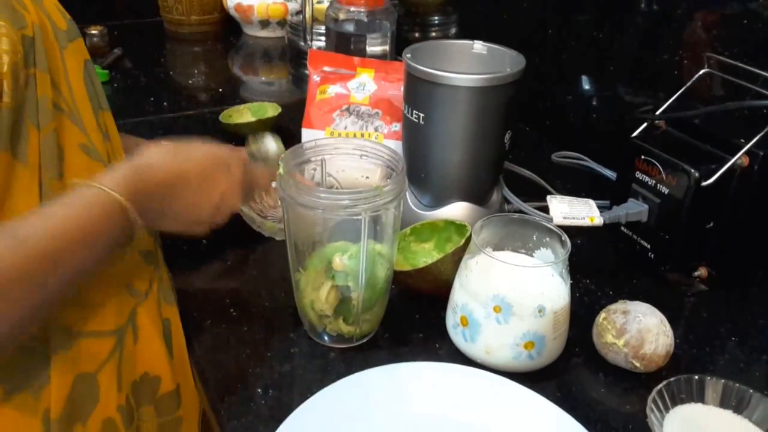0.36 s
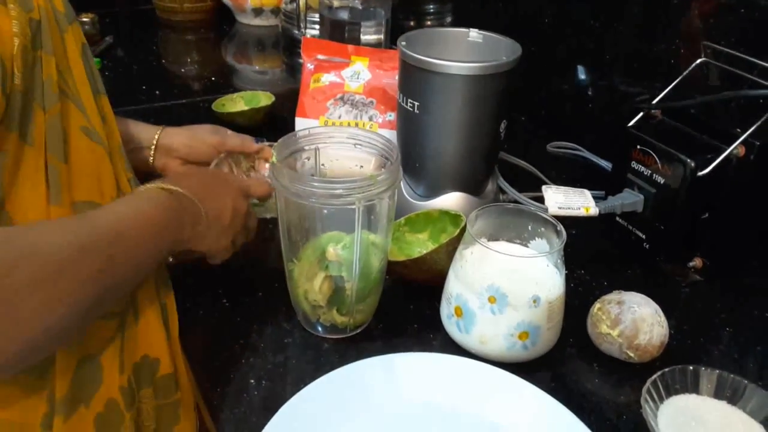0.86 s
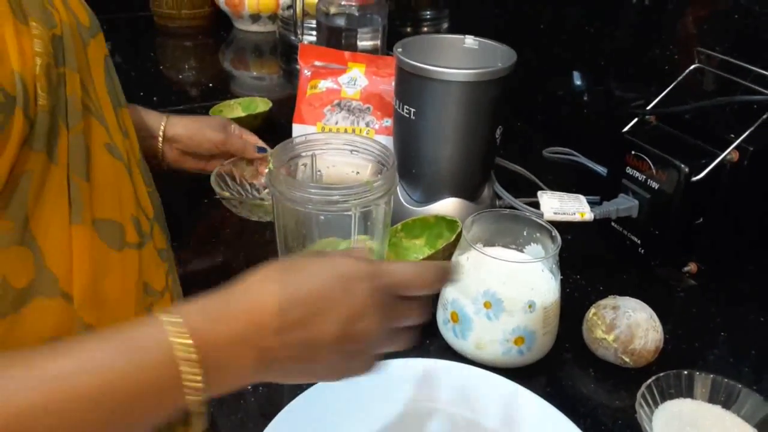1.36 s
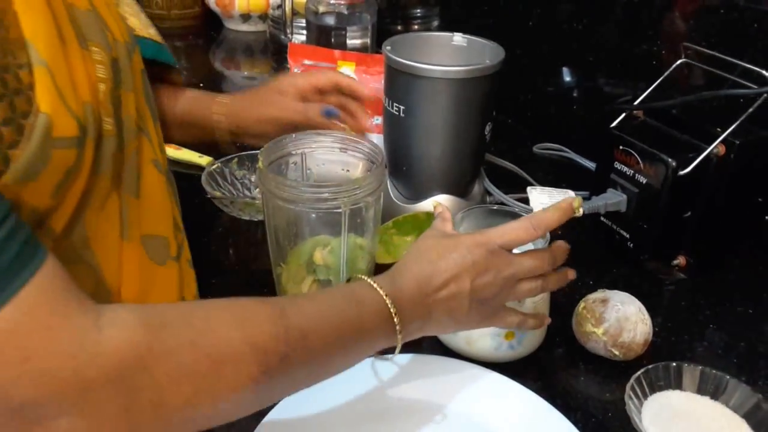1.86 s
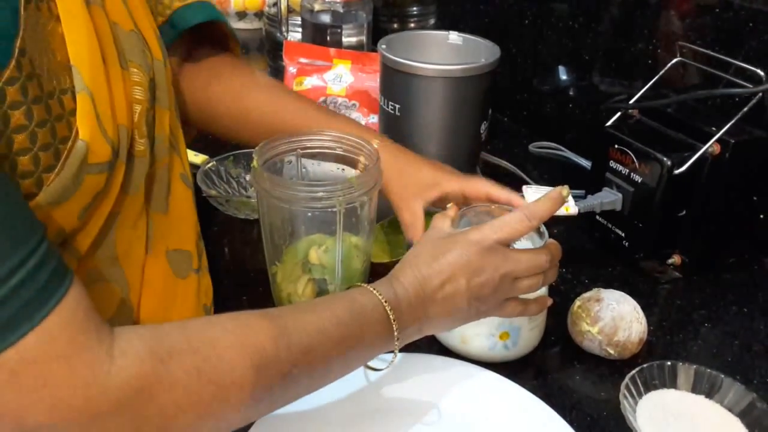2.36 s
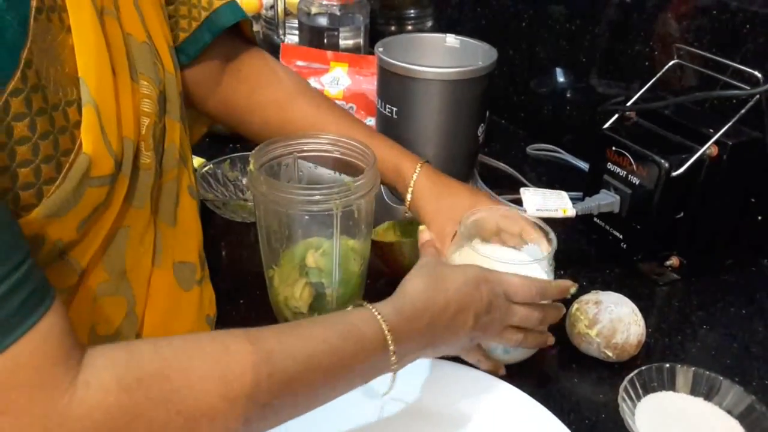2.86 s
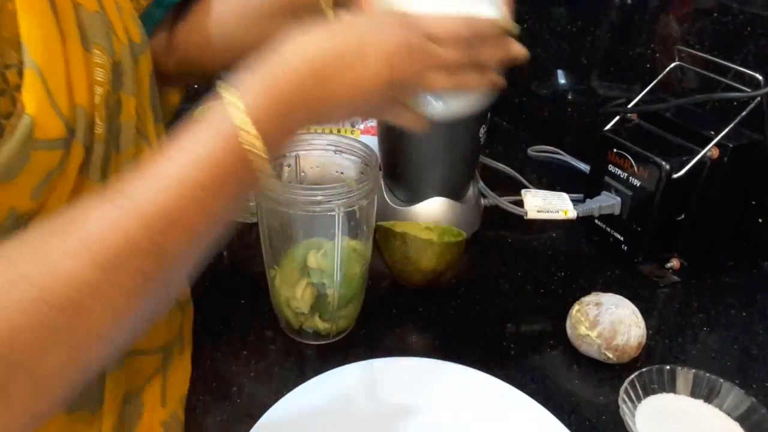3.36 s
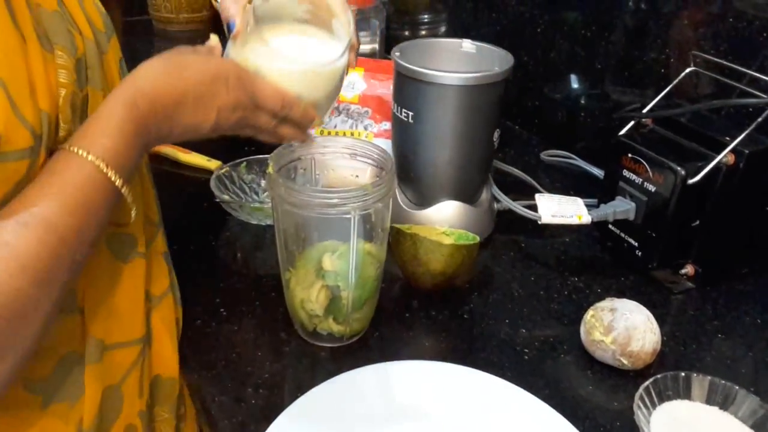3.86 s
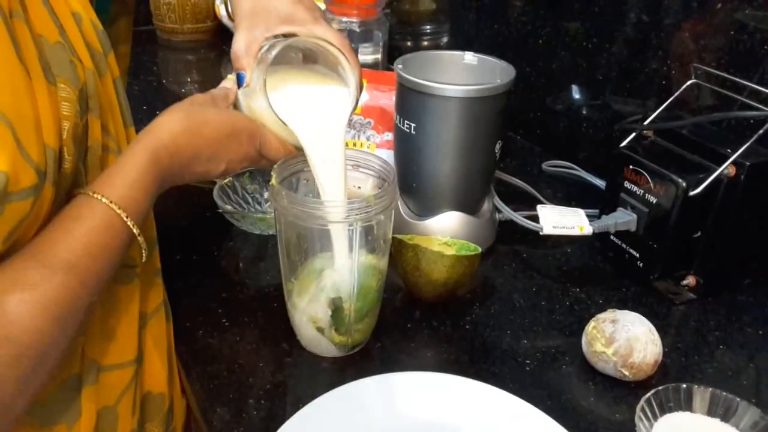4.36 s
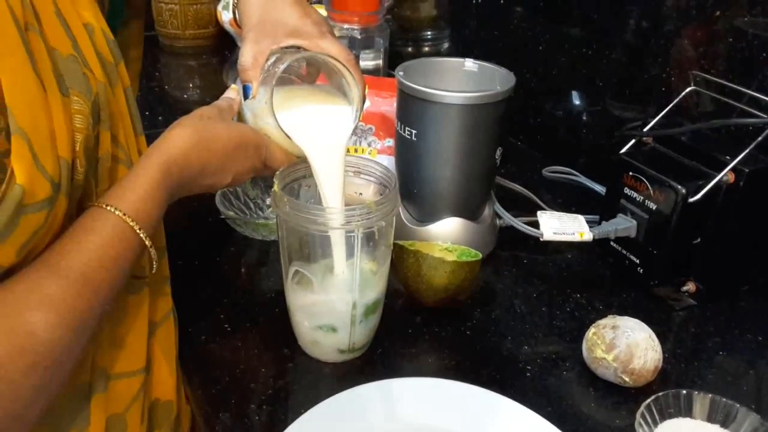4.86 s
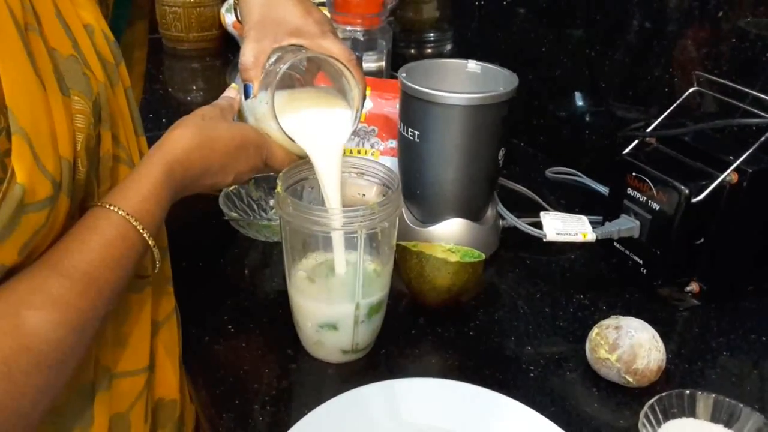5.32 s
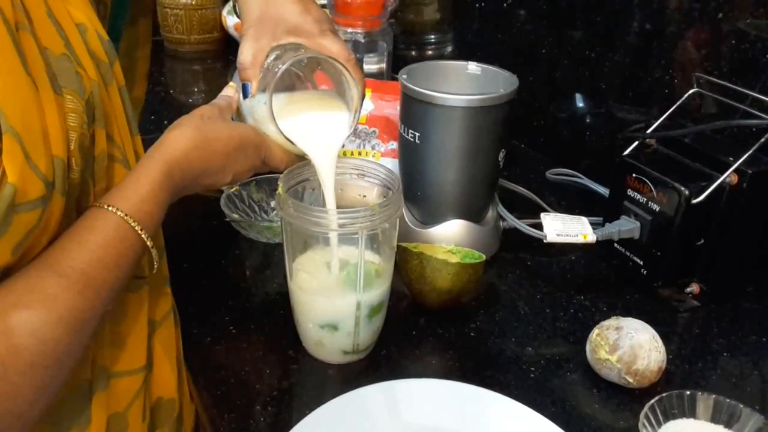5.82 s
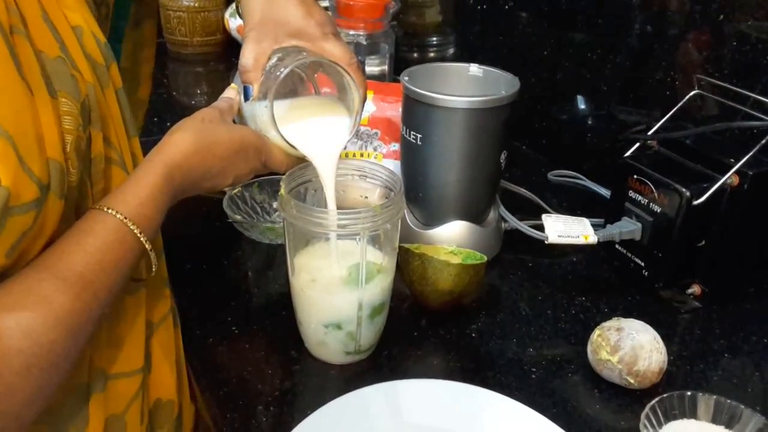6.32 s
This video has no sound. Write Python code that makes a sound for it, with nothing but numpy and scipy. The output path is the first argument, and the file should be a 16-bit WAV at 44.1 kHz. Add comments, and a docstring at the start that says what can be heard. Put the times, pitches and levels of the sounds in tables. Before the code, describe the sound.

In a humming kitchen, steel taps glass and knocks on stone, a soft pause of rustling, then milk splashes and gurgles into a plastic cup.

```python
"""A refrigerator motor hums, an electronic device whines faintly, room and microphone hiss; sleeves rustle.
A steel spoon grazes a plastic cup and clinks on a small glass bowl, then the bowl is set on a stone counter:
beating modes, noise scrapes and noise knocks, in a hard-walled kitchen. A jar is lifted: soft noise puffs.
Milk dribbles, then pours into a tall plastic cup: bubbles, spray, and narrow noise on the air column's modes,
which climb as the cup fills and wander late in the pour."""
import sys
import numpy as np
from scipy import signal
from scipy.fft import rfft, irfft, next_fast_len
from scipy.io import wavfile
from scipy.ndimage import uniform_filter1d, map_coordinates

SR = 44100
rng = np.random.default_rng(int(sys.argv[2]) if len(sys.argv) > 2 else 0)


def wrap_up_sound(samples):
    """Save the sound to the file named by the first command line argument, as 16-bit audio."""
    columns = np.atleast_2d(samples).T
    # keep every value between -1 and 1, then stretch to whole-number steps
    tamed = np.clip(columns, -1, 1)
    steps = np.round(tamed * 32767).astype(np.int16)
    wavfile.write(sys.argv[1], SR, steps)


def voltage_ratio(decibels):
    """Convert decibels (scalar or array-like) to amplitude ratios, 20 dB per decade."""
    exponent = np.asarray(decibels, float) / 20
    return 10 ** exponent


N = 295689
T = np.arange(N) / SR


def unit(x):
    """Scales to unit rms."""
    return x / np.sqrt(np.mean(x ** 2) + 1e-20)


def along(points, hz):
    """Interpolates (f/Hz, value) points on a log axis."""
    f, v = np.transpose(points)
    return np.interp(np.log(hz + 1), np.log(f + 1), v)


def wobble(knots_per_s):
    """A smooth random curve."""
    knots = rng.standard_normal(int(N * knots_per_s / SR) + 4)
    return map_coordinates(knots, [T * knots_per_s])


def filtered(x, response):
    """x times a complex response of frequency."""
    m = next_fast_len(len(x) + SR // 2)
    return irfft(rfft(x, m) * response(np.fft.rfftfreq(m, 1 / SR)), m)[:len(x)]


def resonance(f, hz, width_hz):
    """Second-order band-pass, unity at its centre."""
    return 1j * f * width_hz / (hz * hz - f * f + 1j * f * width_hz)


def noise(response):
    """Unit-rms noise of a given spectrum."""
    return unit(filtered(rng.standard_normal(N), response))


def add(track, s, sound):
    """Mixes a short sound in at time s."""
    part = track[round(s * SR):][:len(sound)]
    part += sound[:len(part)]


def swell(start_s, top_s, end_s):
    """A soft rise and fall between three times."""
    return np.sin(np.pi / 2 * np.interp(T, [start_s, top_s, end_s], [0, 1, 0]))


def curves(tables, rest):
    """Columns of several (t/s, ..) tables, one value per sample, at rest between tables."""
    out = np.full((len(tables[0][0]) - 1, N), rest)
    for rows in tables:
        s, *cols = np.transpose(rows)
        on = (T >= s[0]) & (T <= s[-1])
        out[:, on] = [np.interp(T[on], s, c) for c in cols]
    return out


def breathy(hz, knots_per_s):
    """Narrow-band noise that follows a pitch curve; faster knots widen the band."""
    phase = 2 * np.pi * np.cumsum(hz) / SR
    return unit(wobble(knots_per_s) * np.cos(phase) + wobble(knots_per_s) * np.sin(phase))


# decay of the kitchen: [f/Hz, t60/s]
KITCHEN_T60 = [(100, 0.88), (400, 0.84), (1500, 0.85), (4000, 0.71), (10000, 0.4)]


def kitchen(x):
    """A diffuse tail, each frequency dying at its own speed."""
    hz, t, z = signal.stft(rng.standard_normal(SR), SR, nperseg=256)
    decay = voltage_ratio(-60 * t / along(KITCHEN_T60, hz)[:, None])
    tail = signal.istft(z * decay, SR, nperseg=256)[1]
    delayed = np.pad(x, (180, 0))  # samples
    return signal.fftconvolve(delayed, tail / np.linalg.norm(tail))


# motor orders: [multiple of rotation, mean level/dB]
MOTOR_ORDERS = [(1, -77.5), (2, -70.5), (3, -66.5), (4, -70.5), (5, -72.5), (6, -70), (7, -83.5), (8, -76),
                (10, -74.5)]


def motor_hum():
    """Harmonics of one unsteady rotation, each wavering in level."""
    phase = 2 * np.pi * np.cumsum(56.6 + .5 * wobble(3)) / SR  # Hz
    hum = np.zeros(N)
    for k, db in MOTOR_ORDERS:
        hum += voltage_ratio(db + 2.54 * wobble(9)) * np.sin(k * phase + rng.uniform(0, 2 * np.pi))
    return hum


# whine bands: [f/Hz, width/Hz of each of two passes, level/dB]
WHINE_BANDS = [(7800, 60, -83), (7870, 810, -80), (15400, 100, -82)]


def device_whine():
    """Noise in narrow bands, the top one nearly an octave up."""
    return sum(voltage_ratio(db) * noise(lambda f: resonance(f, hz, w) ** 2) for hz, w, db in WHINE_BANDS)


# room and microphone noise shape: [f/Hz, relative density/dB per Hz]
AIR_SPECTRUM = [(20, -30), (45, -16), (80, -12), (128, 3), (190, -12), (300, -7), (600, -14), (1000, -19.5),
                (2000, -26.5), (5000, -33), (7000, -37), (10000, -37), (11500, -30.5), (16000, -36.5)]


def air_hiss():
    """Broad shaped noise, drifting slowly in level."""
    drift_db = .6 * wobble(1.5)
    return voltage_ratio(-60 + drift_db) * noise(lambda f: voltage_ratio(along(AIR_SPECTRUM, f)))


# sleeves and hands move: [start t/s, loudest t/s, end t/s, level/dB before flutter]
# a swell stops at its end time; one ending before its start is silent
CLOTH_MOVES = [(.05, .3, 1.4, -70.5), (1.8, 2.1, 2.36, -74), (2.248, 2.49, 2.6, -70),
               (2.7, 2.77, 2.73, -71.5), (3.2, 3.555, 3.9, -71), (3.94, 3.99, 3.7, -73.5)]


def rustle():
    """Cloth friction: broad mid-band noise that flutters under slow swells."""
    moves = sum(voltage_ratio(db) * swell(*when) for *when, db in CLOTH_MOVES)
    return moves * voltage_ratio(0.92 * wobble(24.88)) * noise(lambda f: resonance(f, 1470, 2300))


def rings(modes, force_db, tilt_db_per_octave, split):
    """Each mode of an uneven object is a close cluster that beats."""
    t, out = T[:SR // 3], 0
    for hz, db, t60_s in modes:
        near_hz = hz * (1 + split * rng.standard_normal((3, 1)))
        cluster = np.sin(2 * np.pi * (near_hz * t + rng.random((3, 1))))
        cluster = voltage_ratio(rng.normal(0, 3.4, (3, 1))) * cluster
        level_db = force_db + db + rng.normal(0, 1.5) + tilt_db_per_octave * np.log2(hz / 4000)
        out = out + voltage_ratio(level_db - 60 * t / t60_s) * cluster.sum(0) / 2
    return out * (1 - np.exp(-t / 0.0011))


# plastic cup modes: [f/Hz, relative level/dB, t60/s]
CUP_MODES = [(1594, -1, 0.042), (1865, 1, 0.028), (2736, 2, 0.034), (9000, -22.5, 0.05),
             (11600, -20.5, .05)]


def cup_graze(room_db):
    """The spoon sets the cup's short modes ringing."""
    out = np.zeros(N)
    graze = rings(CUP_MODES, -28.5, 0, split=0.016)
    for sound in (graze, voltage_ratio(room_db) * kitchen(graze)):
        add(out, .664, sound)
    return out


# glass bowl and steel spoon modes: [f/Hz, relative level/dB, t60/s]
BOWL_MODES = [(1587, 3, .06), (1882, -6, 0.019), (2690, -4, 0.032), (3570, -13, 0.21), (5300, -12.5, 0.062),
              (6170, -5.5, 0.14), (6955, -15.5, 0.17), (9100, -14, 0.037), (9564, -2, 0.075),
              (11980, -8.5, 0.048), (13160, -19, 0.084), (15000, -21, .07)]
SPOON_MODES = [(3600, -6, 0.14), (4514, -15, 0.071), (6000, -27, 0.23), (7100, -13.5, 0.24),
               (9200, -6.5, 0.06), (10800, -3.5, 0.078), (11900, -9, 0.07), (13200, -9, 0.069),
               (13500, -14.5, .06), (15190, -12, 0.086)]


def bowl_and_spoon(bowl_db, spoon_db, tilt):
    """Both struck bodies ring together."""
    bowl = rings(BOWL_MODES, bowl_db, tilt, split=0.0077)
    return bowl + rings(SPOON_MODES, spoon_db, tilt, split=.008)


# bright scrape noise at each contact: [f/Hz, relative level/dB]
SCRAPE_SPECTRUM = [(500, -15), (1500, 3), (4000, -3), (7000, -3), (10000, -5.5), (13000, 0.5), (14200, -26),
                   (15200, -13), (16000, -6)]


def scrape(bowl_db, spoon_db):
    """Rough contact: a short burst of bright noise."""
    t = T[:SR // 3]
    grit = filtered(rng.standard_normal(len(t)), lambda f: voltage_ratio(along(SCRAPE_SPECTRUM, f)))
    envelope = voltage_ratio(-60 * t / 0.065) * (1 - np.exp(-t / 0.0013))
    return (voltage_ratio(bowl_db + 1.5) + voltage_ratio(spoon_db - 4)) * envelope * grit


# what a knock sounds through: [f/Hz, width/Hz, relative level/dB]
COUNTER_MODES = [(121, 110, -13), (212.4, 17.4, 1), (450, 496, -6.5), (800, 193, 1), (1360, 342, 1.5),
                 (1950, 770, -6), (2480, 240, -9), (3400, 1100, -25)]


def counter_knock(tilt):
    """A noise push through the counter's broad resonances; a harder contact tilts it brighter."""
    t = T[:SR // 3]

    def colour(f):
        stone = sum((-1) ** k * voltage_ratio(db) * resonance(f, hz, w)
                    for k, (hz, w, db) in enumerate(COUNTER_MODES))
        bass_cut = (1j * f / (110 + 1j * f)) ** 2
        return stone * bass_cut * voltage_ratio(tilt * np.log2((f + 100) / 1200))

    envelope = voltage_ratio(-60 * t / 0.059) * (1 - np.exp(-t / 0.0012))
    knock = filtered(envelope * rng.standard_normal(len(t)), colour)
    return knock * 12 / np.linalg.norm(knock)


def contact(out, s, knock_db, knock_tilt, bowl_db, spoon_db, ring_tilt, room_db):
    """One contact rings, scrapes and knocks, and the room answers; tilts in dB per octave."""
    hit = bowl_and_spoon(bowl_db, spoon_db, ring_tilt) + scrape(bowl_db, spoon_db)
    hit = hit + voltage_ratio(knock_db - 4) * counter_knock(knock_tilt)
    add(out, s, hit)
    add(out, s, voltage_ratio(room_db) * kitchen(hit))


# spoon strikes bowl: [t/s, relative bowl level/dB, relative spoon level/dB]
BOWL_CLINKS = [(.664, -35, -53.5), (.746, -20.5, -45.5), (.756, -28.5, -52.5), (.780, -25, -36.5)]


def clinks(room_db):
    """Steel on glass: strong ring over a weak, bright knock."""
    out = np.zeros(N)
    for s, bowl_db, spoon_db in BOWL_CLINKS:
        contact(out, s, bowl_db - 12, 9.8, bowl_db, spoon_db, 0.87, room_db)
    return out


# bowl and spoon meet counter: [t/s, relative knock level/dB, hardness/dB per octave, relative rattle level/dB]
COUNTER_KNOCKS = [(.795, -19, -1.5, -41), (.803, -29.5, -6.5, -42), (.937, -9, -1.5, -42),
                  (.941, -15.5, -2.5, -27), (.948, -26, 11.5, -38.5), (.956, -23, 6, -42),
                  (.970, -19, 1.5, -42), (.977, -23.5, -6, -33.5), (.987, -17.5, -2.5, -26),
                  (.996, -28, -7.5, -43), (1.007, -24.5, 3.5, -34), (1.020, -39.5, 2.5, -41.5),
                  (1.310, -20, 3, -53.5), (1.318, -21.5, 2, -61), (1.326, -33, 3, -57)]


def set_down(room_db):
    """Knocks on stone; the held bowl rings under the rattling spoon."""
    out = np.zeros(N)
    for s, knock_db, hardness, rattle_db in COUNTER_KNOCKS:
        contact(out, s, knock_db, hardness, rattle_db - 5.5, rattle_db, -3.5, room_db)
    return out


# fingers and jar touching: [t/s, relative level/dB, centre f/Hz]
JAR_TAPS = [(2.412, -41.5, 800), (2.45, -54.5, 1084), (2.489, -43.5, 1220), (2.496, -40, 450),
            (2.55, -56, 704), (2.768, -54, 1000), (3.02, -61.5, 3400), (3.319, -50.5, 634)]


def taps(room_db):
    """Soft contacts: a short puff through one broad resonance."""
    out, t = np.zeros(N), T[:SR // 10]
    for s, db, hz in JAR_TAPS:
        puff = unit(filtered(rng.standard_normal(len(t)), lambda f: resonance(f, hz, .5 * hz) ** 2))
        add(out, s, voltage_ratio(db - 3.5 - 60 * t / 0.043) * (1 - np.exp(-t / 0.00072)) * puff)
    return out + voltage_ratio(room_db) * kitchen(out)[:N]


# milk stream, a first dribble, then the pour: [t/s, flow level/dB]
MILK_FLOW = [
    [(3.835, -76.5), (3.875, -61.5), (3.92, -68), (3.95, -83)],
    [(4.33, -77), (4.37, -64.5), (4.45, -61), (4.67, -63.5), (4.8, -57), (4.95, -60), (5.04, -59),
     (5.13, -66), (5.3, -65.5), (5.6, -66.5), (5.84, -65.5), (6.02, -68.5), (6.1, -75), (6.3, -69.5),
     (6.7, -76.5)],
]
# stream wavers and slaps the surface: [t/s, strength/dB before each layer's share]
STREAM_SURGES = [(4.414, 14), (4.79, 5), (5.03, 8.5), (5.16, 17.5), (5.48, 16.5), (5.72, 13), (6.03, 3),
                 (6.15, 10)]


def fed(mid_db, slope, share):
    """Layer level/dB: mid_db at -65 dB flow, slope in dB per dB of flow, share of each surge."""
    rise_s, fall_s = 0.02, 0.063
    flow_db, = curves(MILK_FLOW, -120.)
    surge_db = sum(db * np.exp(np.minimum((T - s) / rise_s, (s - T) / fall_s)) for s, db in STREAM_SURGES)
    return mid_db + slope * (flow_db + 65) + share * surge_db


def bubble(hz, cycles, rise):
    """A damped sine, -20 dB after the given cycles, whose pitch climbs as the cavity closes."""
    u = np.arange(int(3 * cycles / hz * SR) + 8) * hz / SR / cycles
    tone = np.sin(2 * np.pi * cycles * (u + rise * u * u))
    return tone * np.exp(-2.3 * u) * (1 - np.exp(-u * cycles * 2.4))


def spray(spectrum, low_hz, span, per_s, cycles, scatter_db, clump_rate, clumps_db, patchy_db, hiss_share):
    """Dense small bubbles in clumps, on a bed of hiss that flares in patches of pitch and time."""
    draw = rng.random((int(per_s * N / SR), 4))
    begun = draw[:, 0] > MILK_FLOW[0][0][0] * SR / N
    bubbles = np.zeros(N)
    for when, pitch, life, size in draw[begun]:
        hz = low_hz * span ** pitch
        gain = voltage_ratio(along(spectrum, hz) + scatter_db * size ** 2) * np.sqrt(hz / low_hz)
        add(bubbles, when * N / SR, gain * bubble(hz, 3 + cycles * life * life, rise=0.052))
    z = signal.stft(noise(lambda f: voltage_ratio(along(spectrum, f))), nperseg=256)[2]
    field = uniform_filter1d(rng.standard_normal(z.shape), size=6, axis=0)
    field = uniform_filter1d(field, size=4, axis=1)
    hiss = unit(signal.istft(z * voltage_ratio(patchy_db * unit(field)), nperseg=256)[1][:N])
    clumps = voltage_ratio(clumps_db * np.tanh(wobble(clump_rate)))
    return unit(clumps * (0.5 * unit(bubbles) + hiss_share * hiss))


# coarse and fine spray shapes: [f/Hz, relative density/dB per Hz]
SPLASH_SPECTRUM = [(500, -21), (900, 3.5), (1500, -0.5), (2500, 0), (4000, -1), (5500, -5.5), (8000, -42.5)]
FINE_SPECTRUM = [(2500, -24), (4500, -1.5), (7000, 1.5), (10000, -3.5), (13000, 0), (16000, -5.5)]


def splashing():
    """Coarse and fine spray, each driven by the flow."""
    coarse = spray(SPLASH_SPECTRUM, low_hz=800, span=7.1, per_s=800, cycles=27.0, scatter_db=17.0,
                   clump_rate=49, clumps_db=5.5, patchy_db=4.0, hiss_share=0.78)
    fine = spray(FINE_SPECTRUM, low_hz=3996, span=4, per_s=900, cycles=30, scatter_db=23,
                 clump_rate=60, clumps_db=4.0, patchy_db=5.0, hiss_share=0.81)
    return voltage_ratio(fed(-66.5, 1.0, 0.12)) * coarse + voltage_ratio(fed(-70, 1.3, 0.56)) * fine


# air above the milk: [t/s, first mode f/Hz, second mode f/Hz]
AIR_COLUMN = [(3.8, 540, 1840), (4.5, 561.2, 1858), (4.85, 633, 1856), (5.15, 686, 2195), (5.7, 694, 2258),
              (6.7, 655, 2350)]


def air_column():
    """The flow excites two modes of the column as breathy tones."""
    first_hz, second_hz = curves([AIR_COLUMN], 600.)
    first = voltage_ratio(fed(-69, 1, .3) + 3.6 * wobble(25)) * breathy(first_hz, 190)
    return first + voltage_ratio(fed(-81.5, .8, 1.06) + 3.0 * wobble(35)) * breathy(second_hz, 260)


# plops and larger bubbles: [t/s, level/dB, f/Hz]
MILK_PLOPS = [(3.851, -49, 529), (3.885, -48.5, 536), (3.885, -52, 1130), (4.431, -49.5, 560),
              (4.602, -38.5, 608), (4.619, -39.5, 563), (4.688, -40.5, 640), (4.714, -36.5, 541),
              (4.778, -33.5, 616), (4.809, -32, 624), (5.163, -43.5, 2190), (5.615, -43.5, 3600),
              (5.618, -49, 3230), (5.629, -51, 654), (5.794, -50, 649)]


def plops():
    """Large bubbles ring on, higher ones for less time."""
    out = np.zeros(N)
    for s, db, hz in MILK_PLOPS:
        t60_s = 0.061 * (600 / hz) ** 0.33
        add(out, s, voltage_ratio(db) * bubble(hz, t60_s * hz / 3, rise=0.032))
    return out


# single splashes and bubbles: [t/s, relative level/dB, f/Hz]
MILK_DROPS = [(3.851, -42, 2930), (3.863, -41.5, 3850), (3.8825, -38.5, 3600), (4.365, -47, 1830),
              (4.405, -34, 3070), (4.4443, -35.5, 3820), (4.4714, -35, 7400), (4.498, -42, 1340),
              (4.6173, -37, 1800), (4.7166, -21.5, 4650), (4.7745, -31.5, 1870), (4.984, -33.5, 1520),
              (5.038, -41, 5600), (5.1561, -35.5, 6000), (5.2112, -40.5, 4200), (5.2565, -31.5, 7870),
              (5.306, -39, 11000), (5.3277, -39, 5900), (5.3768, -33.5, 7300), (5.39, -36, 3730),
              (5.4301, -45, 1410), (5.6126, -40, 3570), (5.725, -35.5, 2150), (5.727, -45, 7800),
              (5.7848, -40, 2220), (5.892, -45.5, 2300), (5.815, -45, 4700), (5.9724, -41, 1860),
              (5.977, -43, 4660), (6.0336, -43, 2280), (6.15, -41.5, 3750), (6.168, -44, 6300),
              (6.2954, -45, 4900), (6.4693, -47.5, 6220), (6.608, -44, 2280)]


def drops():
    """Each drop is a short bubble tone plus a spatter of noise near its pitch."""
    out, t = np.zeros(N), T[:900]
    for s, db, hz in MILK_DROPS:
        add(out, s, voltage_ratio(db - 11.5) * bubble(hz, 15.5, rise=0.0073))
        grains = rng.standard_normal(len(t))
        spatter = unit(filtered(grains, lambda f: resonance(f, 0.96 * hz, 0.71 * hz) ** 2))
        add(out, s, voltage_ratio(db - 12.5 - 60 * t / 0.032) * (1 - np.exp(-t / 0.00146)) * spatter)
    return out


# air pockets under the stream: [start t/s, loudest t/s, end t/s, start f/Hz, level/dB before flutter]
AIR_POCKETS = [(4.742, 4.79, 5.08, 950, -61), (5.05, 5.4, 5.5, 951, -72)]


def pockets():
    """Pockets close and their breathy pitch climbs ever faster."""
    out = np.zeros(N)
    mean_octaves_per_s = (2.9, 1.4)
    for (start, top, end, start_hz, db), climb in zip(AIR_POCKETS, mean_octaves_per_s):
        span_s = end - start
        progress = np.clip((T - start) / span_s, 0, 1) ** 1.6
        hz = start_hz * 2 ** (climb * span_s * progress)
        out += swell(start, top, end) * voltage_ratio(db + 4.8 * np.tanh(wobble(28))) * breathy(hz, 480)
    return out


def milk(room_db):
    """The stream splashes, traps bubbles and rings the air column, in the room."""
    out = splashing() + air_column() + plops() + drops() + pockets()
    return out + voltage_ratio(room_db) * kitchen(out)[:N]


def scene():
    """Sums all sources into one channel."""
    out = motor_hum() + device_whine() + air_hiss() + rustle()
    out += cup_graze(room_db=-8) + clinks(room_db=-8) + set_down(room_db=-8)
    out += taps(room_db=-6) + milk(room_db=-8)
    return out[None]


def top_cut(x):
    """Nothing passes above the cut-off."""
    return signal.sosfilt(signal.butter(12, 16990, fs=SR, output="sos"), x)


def record(dry):
    """A small microphone rounds the loudest peaks and loses deep bass; band limit and slight offset follow."""
    rounded = dry / (1 + np.abs(dry / .3) ** 4) ** (1 / 4)
    top_hz, bass_hz, offset = 15870, 45, -.0005
    limited = filtered(rounded[0], lambda f: (f < top_hz) * 1j * f / (bass_hz + 1j * f))
    return top_cut(limited[None] + offset)


dry = scene()
out = record(dry)
wrap_up_sound(out)
```